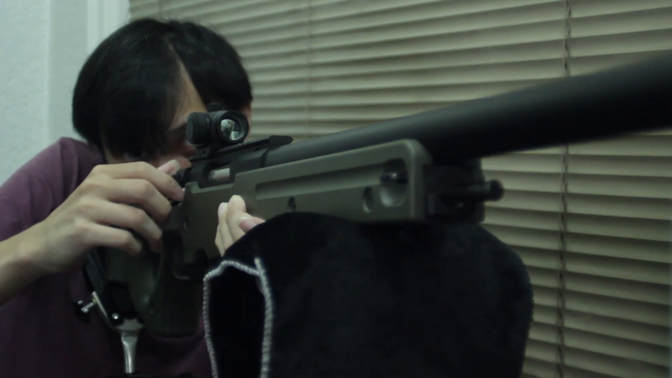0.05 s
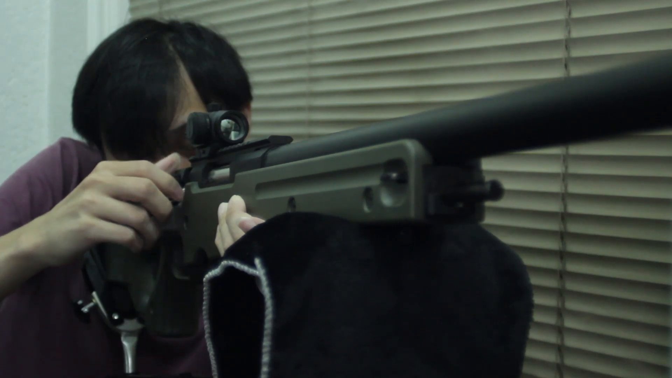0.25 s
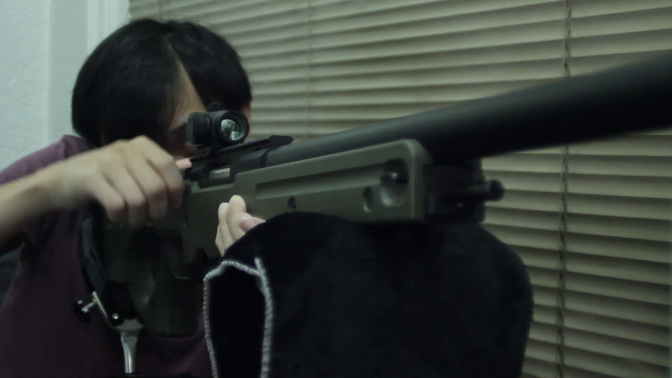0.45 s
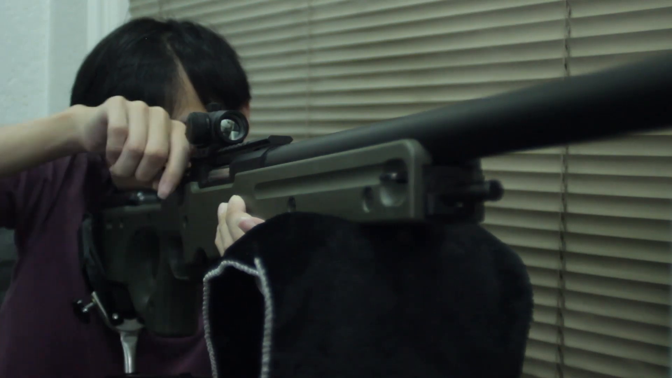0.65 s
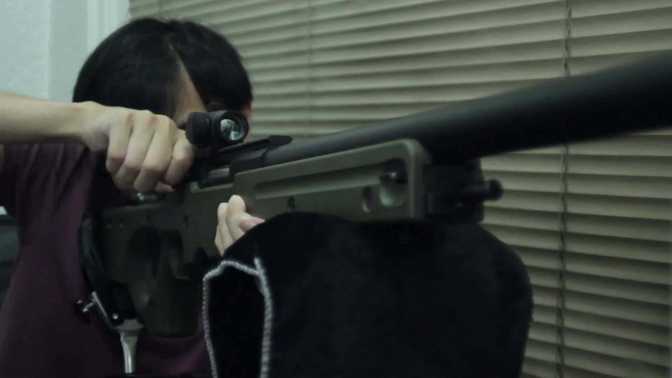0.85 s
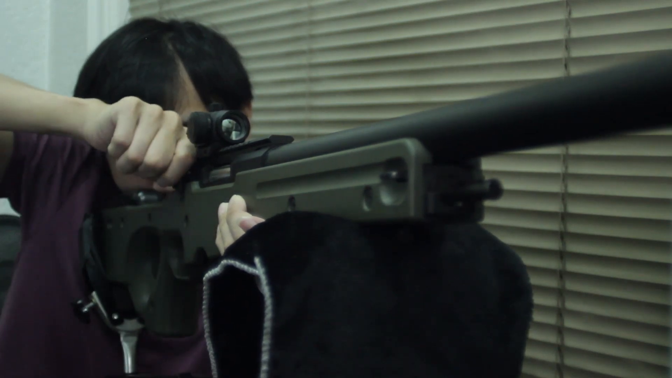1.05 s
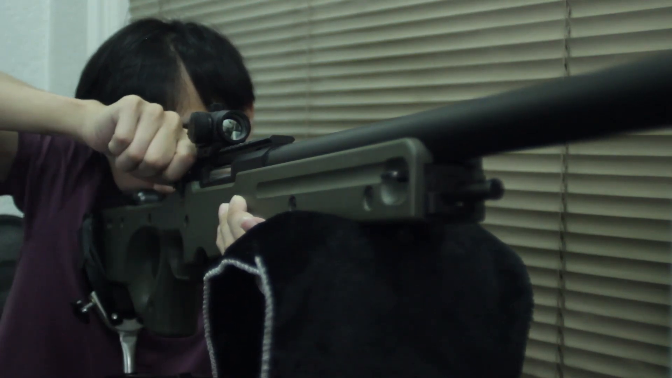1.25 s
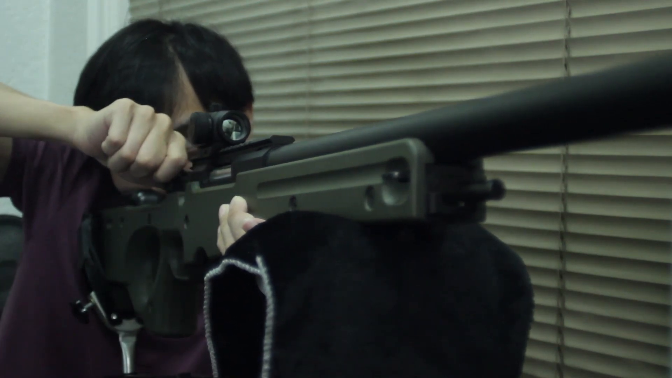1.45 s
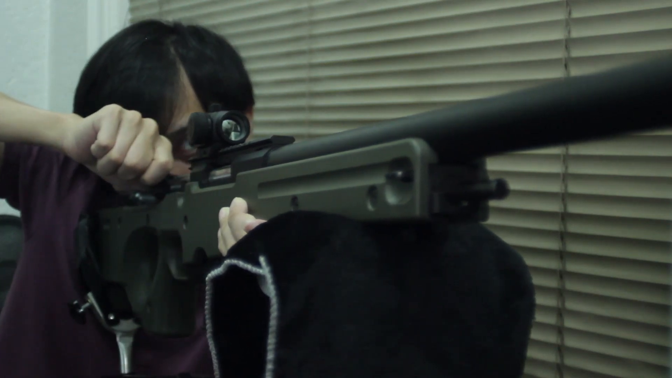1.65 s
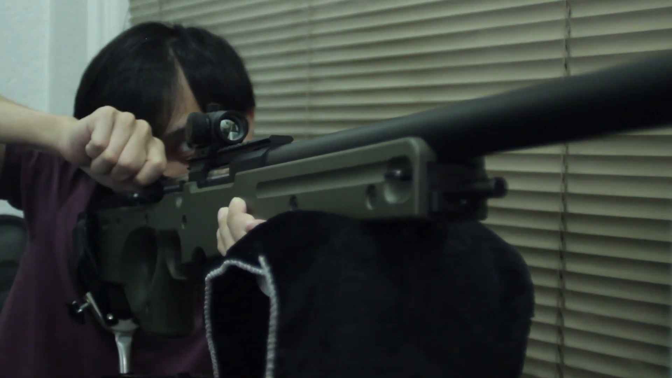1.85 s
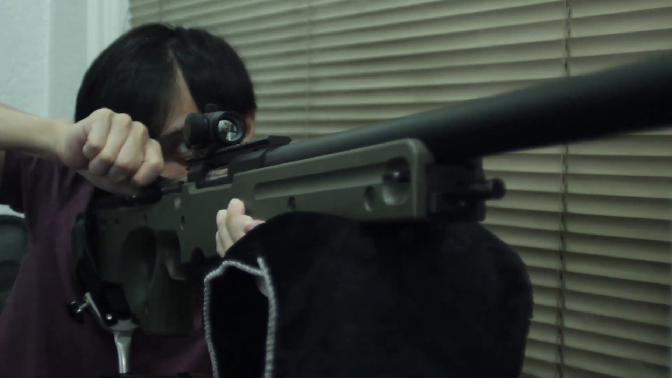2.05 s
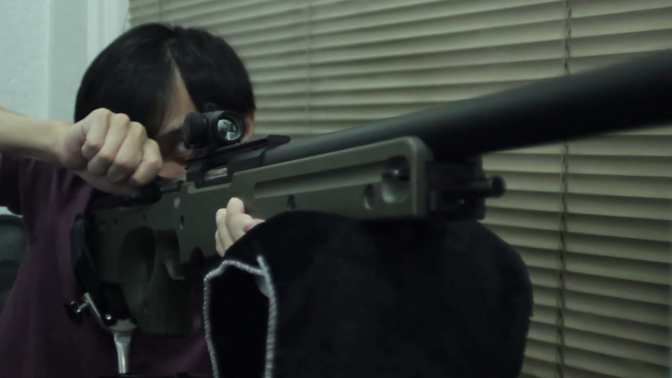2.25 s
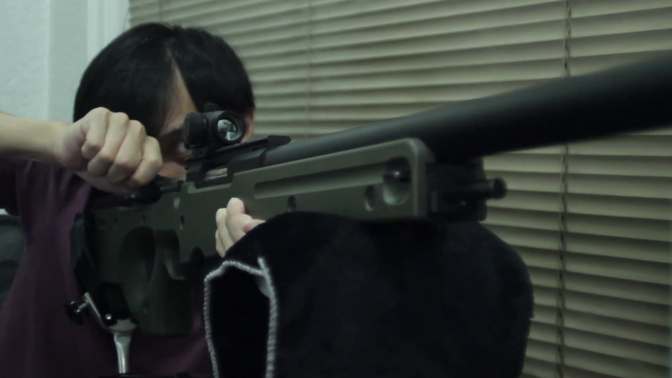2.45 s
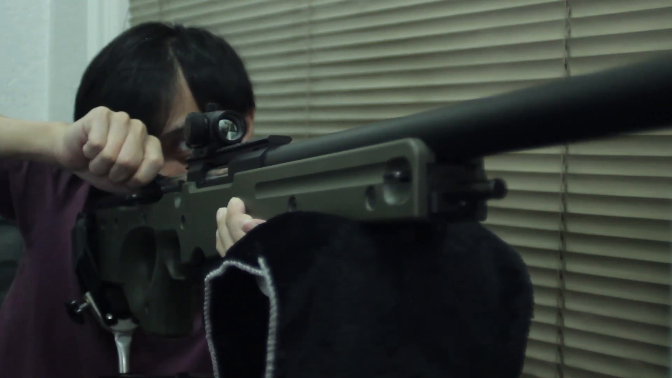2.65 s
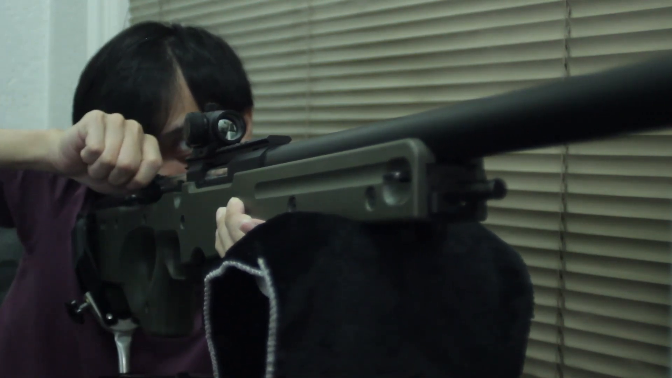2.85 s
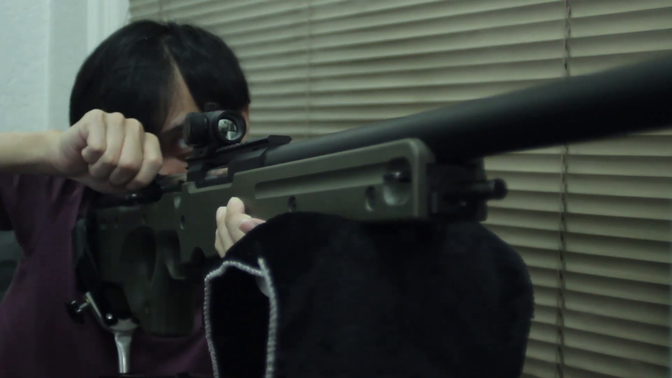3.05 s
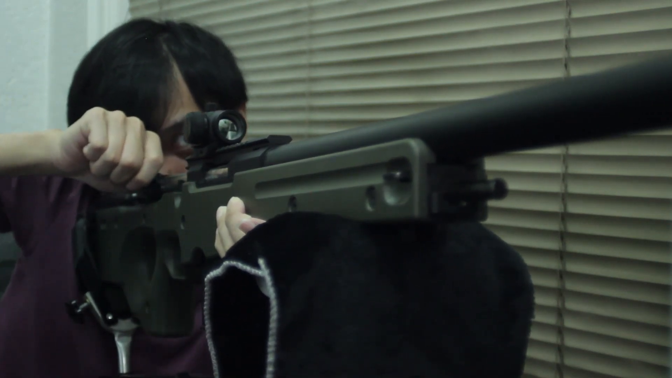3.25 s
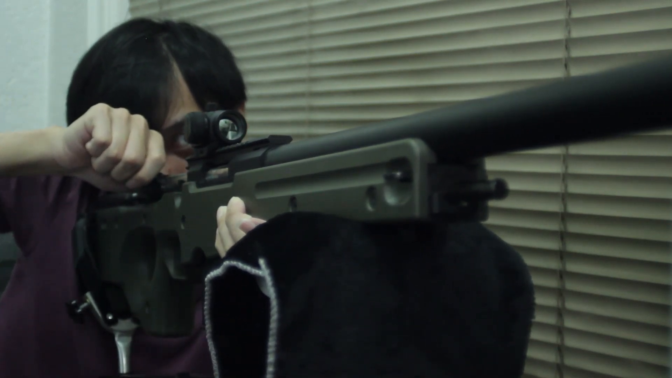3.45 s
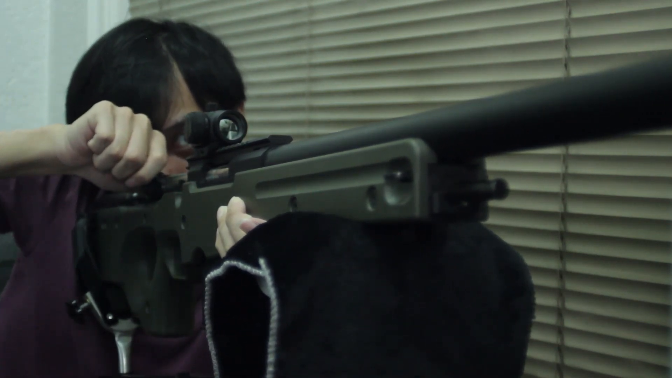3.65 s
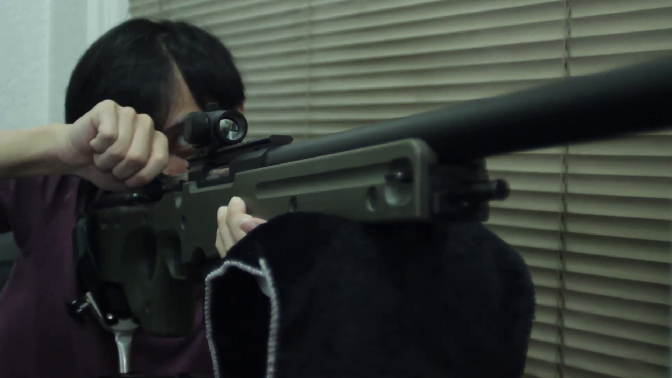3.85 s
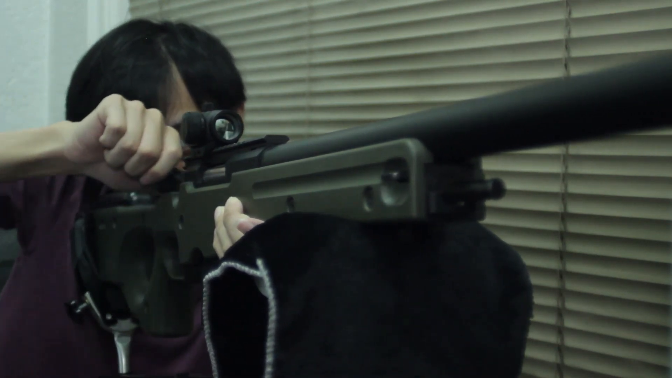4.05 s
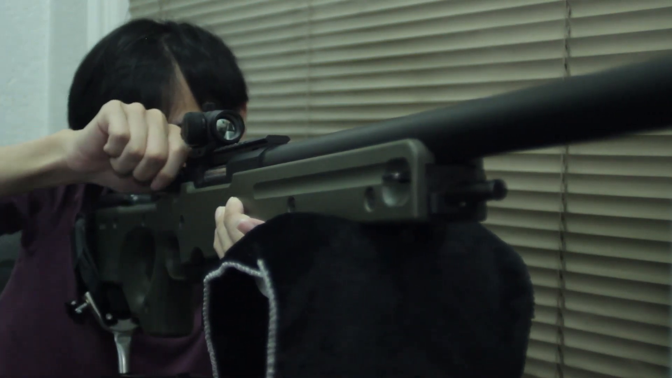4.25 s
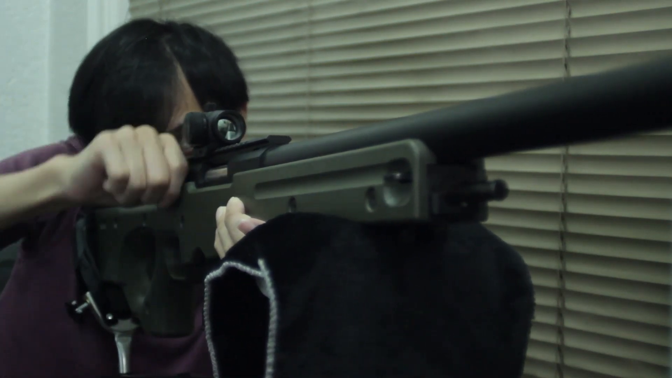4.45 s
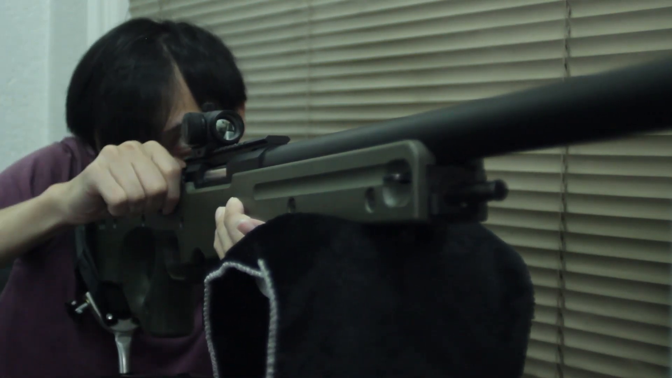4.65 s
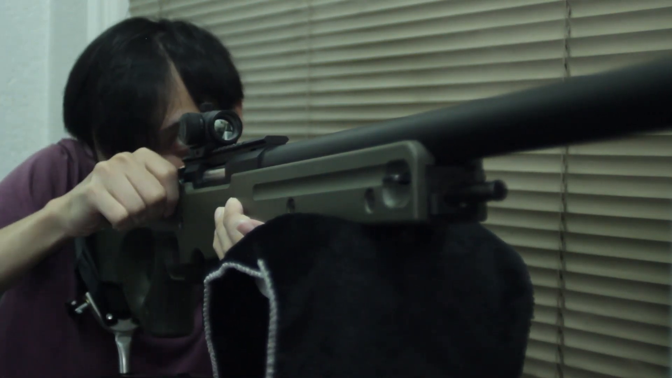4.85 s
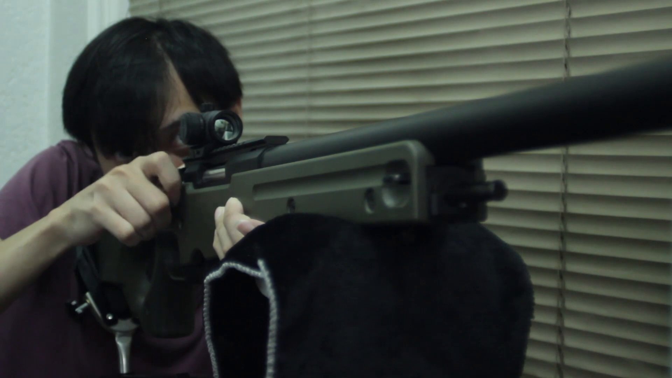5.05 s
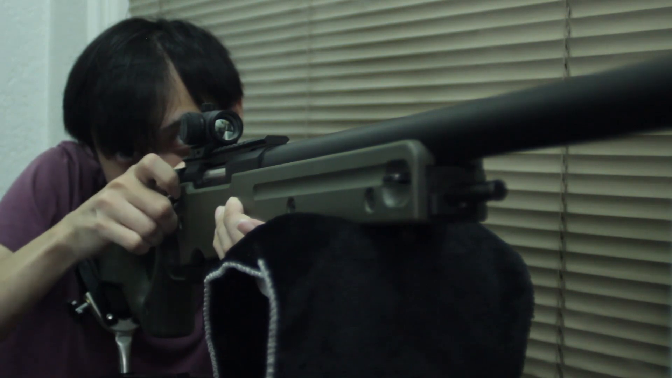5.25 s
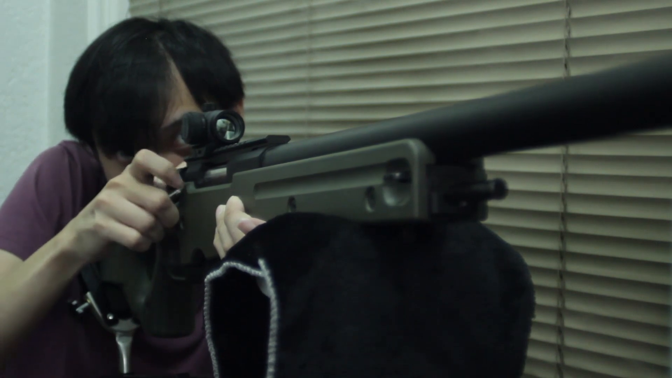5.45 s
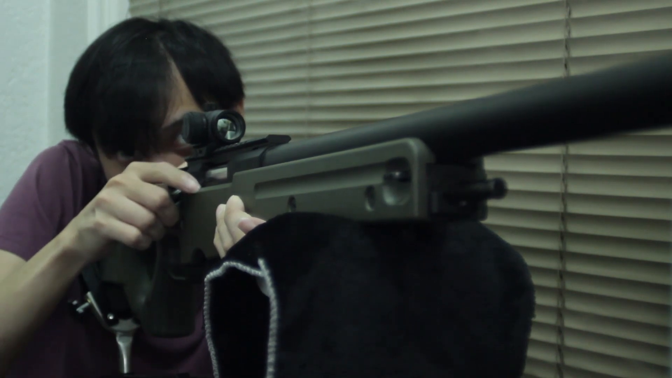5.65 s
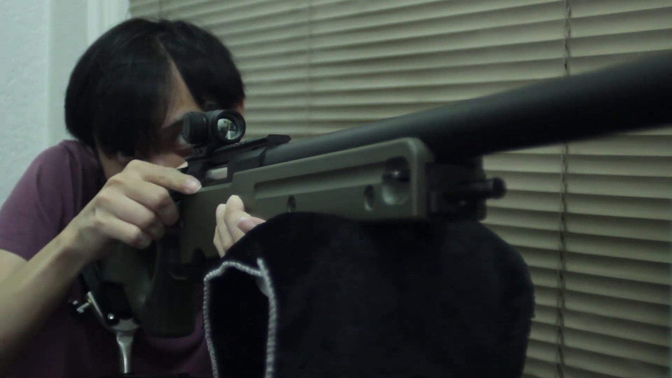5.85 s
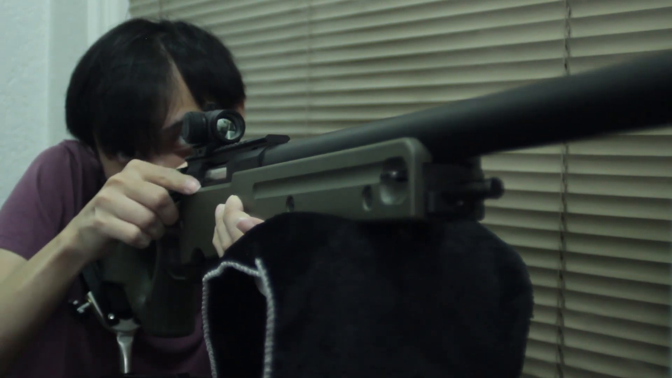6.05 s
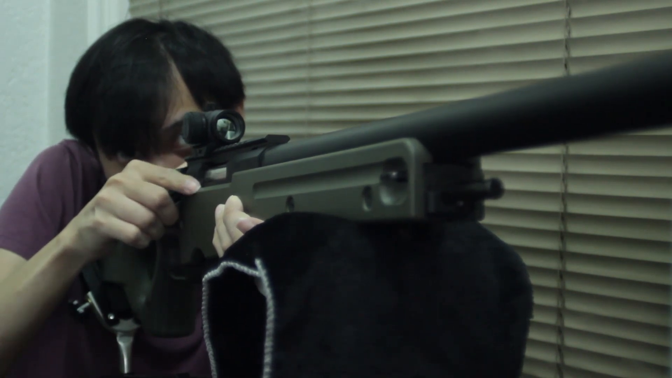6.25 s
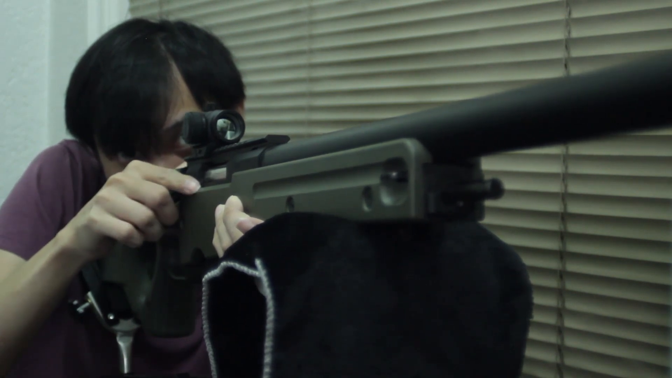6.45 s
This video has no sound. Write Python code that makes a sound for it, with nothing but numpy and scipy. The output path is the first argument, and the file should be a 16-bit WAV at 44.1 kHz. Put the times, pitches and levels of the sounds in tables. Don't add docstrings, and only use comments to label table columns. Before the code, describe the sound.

A close microphone in a small, furnished, dry room hears a spring airsoft rifle's steel bolt worked in a hollow plastic stock. Steady low motor and mains hum, soft air noise and slight hiss lie very quietly beneath. At 0.6 s a short hollow clack lifts the bolt. A tiny tick comes at 1.0, a light metallic click at 1.37, then faint gritty rubbing and duller knocks at 1.6 to 1.7. Clicks thicken from 1.8 to a bright, crisp catch at 2.13; a soft knock follows at 2.4. Then near silence. At 3.99 the loudest, sharpest steel snap opens the push home: rapid woody knocks, scrapes and clicks at 4.07 to 4.28, a firm clack at 4.35, and weaker bumps to 4.6. A muffled locking clunk lands at 5.16, a faint click at 5.64 and a barely audible tap at 6.3. Echoes die almost instantly.

```python
import sys
import numpy as np
from scipy import signal
from scipy.fft import rfft, irfft, next_fast_len
from scipy.io import wavfile
from scipy.ndimage import map_coordinates

SR = 44100
rng = np.random.default_rng(int(sys.argv[2]) if len(sys.argv) > 2 else 0)


def gain_from_db(level_db):
    decades = np.asarray(level_db, float) / 20
    return 10 ** decades


def unload_wav(signal):
    wavfile.write(
        sys.argv[1],
        SR,
        np.round(np.clip(np.atleast_2d(signal).T, -1, 1) * 32767).astype(np.int16),
    )


N = 287266

# frequency in Hz, width in Hz, level in dB.
BUTT_MODES = [(283, 125, -11), (518, 94, -6.5), (735, 130, -3.5), (997, 200, 4), (1220, 420, -7)]
FORE_END_MODES = [(1398, 183, 1), (1820, 304, 3.5), (2670, 1050, -5.5)]
RECEIVER_MODES = [(2970, 370, -5), (3567, 294, 2.5), (3966, 590, -1), (4880, 277, 0.5), (5320, 1300, -5)]
BOLT_MODES = [(6230, 1430, -8), (8430, 1150, -1), (9550, 900, -0.5)]
CATCH_MODES = [(10200, 2300, -0.5), (13600, 3700, 2.5), (15200, 1360, 7.5)]
PARTS = BUTT_MODES, FORE_END_MODES, RECEIVER_MODES, BOLT_MODES, CATCH_MODES


def steel_snaps():
    # time in seconds, receiver in dB, butt in dB re receiver, bolt in dB re receiver,
    # catch in dB re bolt.
    snaps = [(0.9837, -43, -6, 1, -6), (1.3178, -49.5, -3, 0, -12), (1.367, -35, -12, -3, -1.5),
             (1.4041, -44, 2.5, 5, 0), (1.8095, -25.5, -5.5, -8.5, -4), (1.8576, -39.5, -16, 4.5, -2.5),
             (1.889, -29, -15, -1.5, -5), (1.9723, -28.5, -1.5, -10.5, -4), (2.1027, -31, -3.5, -13, -7),
             (2.1309, -18.5, -19, -1.5, -5), (2.1355, -24.5, -14, 8, 0.5), (3.9906, -13, -17.5, 1.5, -3),
             (4.1012, -27, -28, -4.5, -16), (4.2131, -38.5, -7, 3, -7), (4.2625, -26, -24, -10, -5),
             (4.2754, -27, -2.5, -4, -12), (4.2802, -20.5, -12.5, -8, 1.5), (4.351, -19.5, -8.5, -32, 1.5),
             (4.5828, -39, -20, -23, -9), (4.5967, -44, -30, -21, -11), (5.1714, -25.5, -5, -12.5, -24),
             (5.641, -38.5, -17, -9.5, -14)]
    contact_s = 0.0014
    rows = []
    for start_s, receiver_db, butt_db, bolt_db, catch_db in snaps:
        fore_end_db = -0.44 + 0.34 * butt_db
        others_db = np.array([fore_end_db, 0, bolt_db, bolt_db + catch_db]) - butt_db
        rows.append((start_s, receiver_db + butt_db, *others_db, contact_s))
    return contacts(rows, rise=2.1)


def stock_knocks():
    # time in seconds, butt in dB, fore-end in dB re butt, receiver in dB re butt,
    # contact in seconds.
    knocks = [(0.512, -59, 8, -6, 0.0032), (0.584, -22, -1.5, 0.5, 0.002), (1.582, -28.5, -6, -11, 0.0046),
              (1.671, -35, -4, -6, 0.0026), (1.987, -57, -5, -15, 0.0031), (2.391, -31, 5, -2.5, 0.0045),
              (2.596, -59, 8, 3, 0.0031), (4.073, -29.5, -5, -3, 0.0019), (4.138, -31.5, 2, -10, 0.0022),
              (4.231, -37.5, -10, -12, 0.0024), (4.338, -27.5, 4.5, -7, 0.0067),
              (4.504, -33.5, -2.5, -25, 0.0034), (4.562, -49, -19, 0, 0.0023),
              (4.806, -51, -13, -14, 0.0031), (5.151, -31.5, 4.5, -4, 0.0061),
              (5.682, -50.5, -1, -1, 0.0039), (6.304, -41, -4, -7, 0.0022)]
    dull_db_per_ms, catch_re_bolt_db, lead_s = -1, -8, 0.0012
    rows = []
    for time_s, butt_db, fore_end_db, receiver_db, contact_s in knocks:
        bolt_db = -6 + receiver_db + dull_db_per_ms * 1000 * contact_s
        catch_db = bolt_db + catch_re_bolt_db
        rows.append((time_s - lead_s, butt_db, fore_end_db, receiver_db, bolt_db, catch_db, contact_s))
    return contacts(rows, rise=0.69)


def contacts(rows, rise):
    out, t = np.zeros(N + SR), np.arange(2048) / SR
    for start_s, butt_db, *others_db, contact_s in rows:
        u = t / np.clip(contact_s, 3e-4, 0.008)
        force = rattle((1 - np.exp(-rise * u)) * np.exp(-u))
        start = round(start_s * SR)
        for modes, re_butt_db in zip(PARTS, [0, *others_db]):
            sound = ringing(force, modes)
            peak = np.abs(sound).max()
            out[start:start + len(t)] += gain_from_db(butt_db + re_butt_db) * sound / peak
    return out[:N]


def rattle(shape, count=12):
    force = rng.standard_normal(len(shape)) * shape
    for _ in range(count):
        spectrum = rfft(force)
        flat = spectrum / (np.abs(spectrum) + 1e-12)
        force = irfft(flat, len(shape)) * np.linalg.norm(shape)
        force = np.clip(force, -2 * shape, 2 * shape)
    return force


def single_rings():
    # time in seconds, peak level in dB, frequency in Hz, t60 in seconds.
    modes = [(0.5845, -21, 913, 0.037), (0.585, -27.5, 1480, .02), (0.585, -21.5, 1830, 0.034),
             (0.9835, -41.5, 5200, .06), (0.99, -43, 1500, .03), (0.984, -46, 2560, .04),
             (1.3683, -29, 5320, 0.015), (1.396, -33, 5900, .012), (1.584, -23.5, 855, 0.016),
             (1.9725, -30, 965, 0.025), (2.1326, -20, 4500, 0.012), (2.135, -20.5, 1880, 0.018),
             (2.392, -34, 1870, .035), (3.9913, -7.5, 8300, 0.007), (3.992, -21, 1810, 0.019),
             (3.992, -25, 6360, .06), (4.072, -20, 1230, 0.013), (4.141, -21, 1370, 0.014),
             (4.2807, -21, 4146, 0.025), (4.2807, -24, 6470, 0.015), (4.281, -23, 8400, .016),
             (4.352, -19.5, 1606, 0.029), (4.353, -16, 3000, 0.0076), (4.505, -36, 950, .025),
             (4.596, -40, 4300, .012), (5.156, -26.5, 1056, .025), (5.642, -40, 1340, 0.021),
             (5.642, -37, 4900, .007)]
    damped_s, damped_cycles, onset_s = 0.045, 20, 0.00033
    out, t = np.zeros(N), np.arange(SR // 5) / SR
    onset = 1 - np.exp(-t / onset_s)
    for start_s, peak_db, hz, t60_s in modes:
        t60_s = min(t60_s, damped_s, damped_cycles / hz + 0.0025 * hz / 250)
        decay = gain_from_db(peak_db - 2 - 60 * t / t60_s)
        start = round(start_s * SR)
        out[start:start + len(t)] += decay * np.sin(2 * np.pi * hz * t) * onset
    return out


def bolt_sliding():
    # start in seconds, speeding up in seconds,
    # slowing down in seconds, butt in dB, receiver in dB re butt.
    draw = [(0.39, 0.017, 0.072, -66, 9.5), (.578, 0.0075, .004, -35, 5), (.981, .004, 0.062, -49.5, 2),
            (1.31, 0.05, 0.062, -46, 4), (1.36, 0.048, 0.11, -51.5, 2), (1.44, 0.064, 0.048, -41, -4),
            (1.51, 0.032, 0.057, -41.5, -3), (1.555, 0.028, 0.049, -34, -4),
            (1.667, 0.0036, 0.058, -41.5, -4.5), (1.672, 0.028, .075, -40.5, -7),
            (1.815, 0.026, 0.054, -40.5, -1), (1.84, 0.044, .07, -43, 2), (2.103, 0.005, 0.033, -37.5, -5),
            (2.112, 0.021, 0.0033, -40.5, 9), (2.35, 0.05, 0.0048, -43.5, 1.5)]
    push = [(3.972, 0.024, .004, -43.5, 16), (4.076, 0.0023, 0.027, -38, 1), (4.095, .022, .04, -49, 15),
            (4.14, 0.0033, 0.028, -39, 0.5), (4.15, 0.02, 0.042, -58, 13.5),
            (4.222, 0.014, 0.037, -41.5, -8), (4.285, 0.0044, 0.069, -34.5, 1),
            (4.35, 0.0056, 0.094, -45, 0.5), (4.505, 0.0039, 0.1, -41, -17),
            (4.56, 0.027, 0.033, -59.5, 12.5), (5.5, .04, .06, -72, 12), (5.64, .004, .07, -60, 4.5)]
    grains_per_s, size_db, judder_db, catch_db = 4000, 2, 2.5, -5
    rise_power, fall_power, trim_db = 2.47, 2.65, -9
    t, out = np.arange(N) / SR, np.zeros(N)

    caught = rng.random(N) < grains_per_s / SR
    grains = caught * rng.standard_normal(N) * gain_from_db(size_db * rng.exponential(size=N))
    judder = map_coordinates(rng.standard_normal(N // 300 + 4), [np.arange(N) / 300])
    force = grains * gain_from_db(judder_db * judder)
    butt, fore_end, receiver, bolt, catch = (unit(ringing(force, modes)) for modes in PARTS)
    steel = bolt + gain_from_db(catch_db) * catch

    # dB re butt, share of the receiver's dB that is followed
    for strokes, fore_end_rule, bolt_rule in ((draw, (4.7, 0.32), (-11.5, 1.5)),
                                              (push, (-0.9, 0.25), (-8.5, 0.99))):
        for start_s, up_s, down_s, butt_db, receiver_db in strokes:
            span = slice(round(start_s * SR), round((start_s + up_s + down_s) * SR))
            u = t[span] - start_s
            rising = np.abs(np.sin(np.pi / 2 * u / up_s)) ** rise_power
            falling = np.abs(np.cos(np.pi / 2 * (u - up_s) / down_s)) ** fall_power
            rubbing = np.where(u < up_s, rising, falling)
            mix = butt[span] + gain_from_db(receiver_db) * receiver[span]
            mix += gain_from_db(follow(fore_end_rule, receiver_db)) * fore_end[span]
            mix += gain_from_db(follow(bolt_rule, receiver_db)) * steel[span]
            out[span] += gain_from_db(butt_db + trim_db) * rubbing * mix
    return out


def follow(rule, db):
    offset_db, share = rule
    return offset_db + share * db


def ringing(x, modes, reach=2.5):
    hz, width_hz, db = np.transpose(modes)[:, :, None]
    gain = gain_from_db(db) * (-1.) ** np.arange(len(modes))[:, None]
    top_hz = reach * hz.max()

    def response(f):
        fall = top_hz ** 2 / (top_hz ** 2 - f * f + 1j * f * top_hz * np.sqrt(2))
        damping = 1j * f * width_hz
        return fall * np.sum(gain * damping / (hz * hz - f * f + damping), axis=0)

    return filtered(x, response)


def unit(x):
    return x / np.sqrt(np.mean(x ** 2) + 1e-20)


def filtered(x, response):
    m = next_fast_len(len(x) + 4096)
    return irfft(rfft(x, m) * response(np.fft.rfftfreq(m, 1 / SR)), m)[:len(x)]


def room(x, t60_s=0.2, treble_t60_s=0.14, gap_s=0.00023, size=2048):
    t = np.arange(SR // 4) / SR
    blocks = np.pad(x, (0, -N % size)).reshape(-1, size)
    noise = rng.standard_normal((len(blocks), len(t)))
    low = signal.sosfilt(signal.butter(2, 9000, fs=SR, output="sos"), noise)
    tails = low * gain_from_db(-60 * t / t60_s) + (noise - low) * gain_from_db(-60 * t / treble_t60_s)
    tails *= 1 - np.exp(-(t / gap_s) ** 2)
    wet = signal.fftconvolve(blocks, tails / np.linalg.norm(tails[0]), axes=1)
    where = np.arange(len(blocks))[:, None] * size + np.arange(wet.shape[1])
    return np.bincount(where.ravel(), wet.ravel())[:N]


def background():
    # multiple of shaft, multiple of fan, multiple of mains, rms level in dB.
    hum = [(1, 0, 0, -59), (2, 0, 0, -61), (3, 0, 0, -62), (4, 0, 0, -75), (5, 0, 0, -69), (0, 1, 0, -61),
           (0, 2, 0, -74), (0, 0, 1, -68), (0, 0, 3, -71), (1, 0, 1, -61), (1, 0, 2, -63)]
    # frequency in Hz, density in dB per Hz.
    air_spectrum = [(20, -19), (50, -12), (65, -14), (90, -16), (125, 0.5), (190, -6.5), (330, -5),
                    (420, -7.5), (700, -11), (1500, -16), (3000, -21), (6000, -24.5), (10000, -28.5),
                    (15500, -27)]
    shaft_hz, fan_hz, mains_hz, duct_hz = 57.495, 69.11, 120.15, 153.4
    t, tones = np.arange(N) / SR, np.zeros(N)
    for shaft, fan, mains, rms_db in hum:
        tone_hz = shaft * shaft_hz + fan * fan_hz + mains * mains_hz
        tones += np.sqrt(2) * gain_from_db(rms_db) * np.sin(2 * np.pi * (tone_hz * t + rng.random()))
    duct = gain_from_db(-68) * np.sin(2 * np.pi * duct_hz * t)
    hz, db = np.transpose(air_spectrum)
    air = filtered(rng.standard_normal(N), lambda f: gain_from_db(np.interp(np.log(f + 1), np.log(hz), db)))
    return gain_from_db(0.5) * tones + duct + gain_from_db(-54.5) * unit(air)


def scene():
    rifle = gain_from_db(-0.5) * steel_snaps() + gain_from_db(-1) * stock_knocks() + single_rings() + bolt_sliding()
    return (rifle + gain_from_db(3.5) * room(rifle) + background())[None]


def band_dropouts(x, band_hz=450, thin_hz=4000, size=2048):
    # frame centre in seconds, lower limit in Hz, share of bands kept (0-1),
    # window flatness (no unit).
    dropouts = [(.43, 1800, .6, 2), (.503, 1500, .5, 40), (1.302, 2500, .5, 3), (1.346, 5000, .6, 2),
                (1.39, 7000, .6, 2), (1.445, 4000, .8, 30), (1.835, 8800, .05, 20), (1.945, 5000, .7, 2),
                (2.285, 2500, .5, 2), (2.35, 1500, .5, 2), (2.478, 5000, .3, 2), (4.525, 5000, .5, 6),
                (4.589, 6500, .5, 2), (5.058, 1500, .7, 2), (5.23, 6500, .3, 2), (6.316, 5000, .3, 2)]
    x, hz = x.copy(), np.fft.rfftfreq(size, 1 / SR)
    band = (hz / band_hz).astype(int)
    for centre_s, above_hz, kept, flatness in dropouts:
        window = signal.windows.kaiser_bessel_derived(size, flatness)
        centre = round(centre_s * SR)
        frame = slice(centre - size // 2, centre + size // 2)
        chance_kept = kept * np.exp((above_hz - band * band_hz) / thin_hz)
        lost = (rng.random(size)[band] > chance_kept) & (hz > above_hz)
        fade = 1 - np.sqrt(1 - window ** 2)
        x[frame] -= fade * irfft(rfft(x[frame]) * lost)
    return x


def top_cut(x):
    return signal.sosfilt(signal.butter(12, 16810, fs=SR, output="sos"), x)


def record(dry):
    top_hz, offset = 15750, 0.0007
    limited = filtered(dry[0], lambda hz: 1 / np.sqrt(1 + (hz / top_hz) ** 400))
    mix = band_dropouts(limited + offset)[None]
    return top_cut(mix)


dry = scene()
out = record(dry)
unload_wav(out)
```